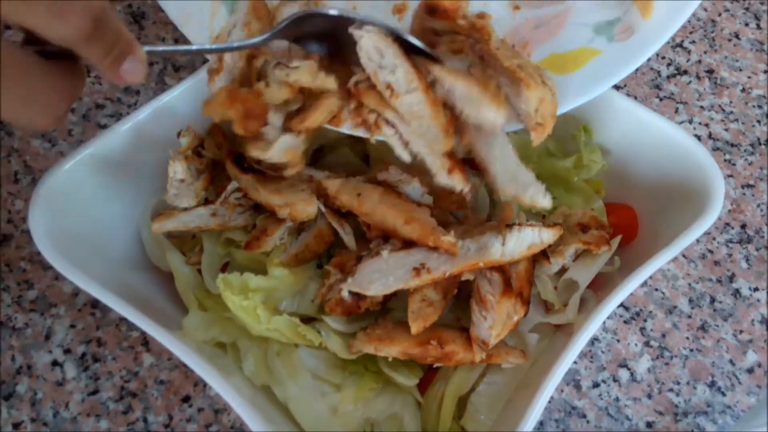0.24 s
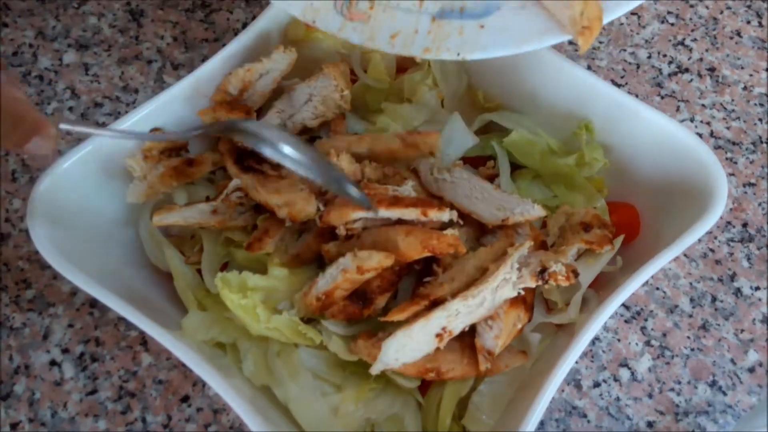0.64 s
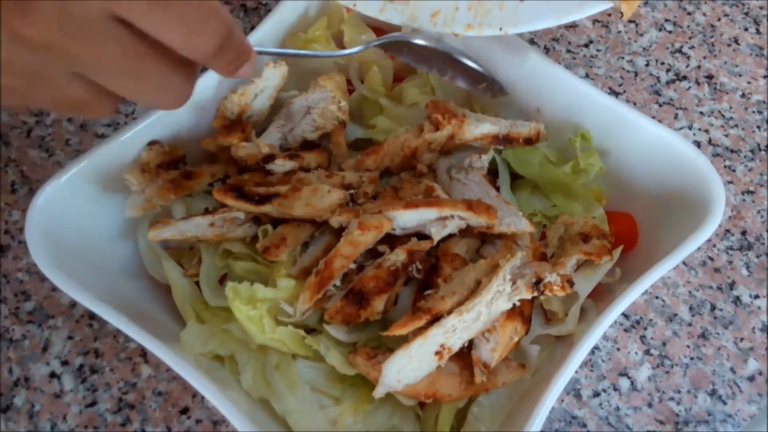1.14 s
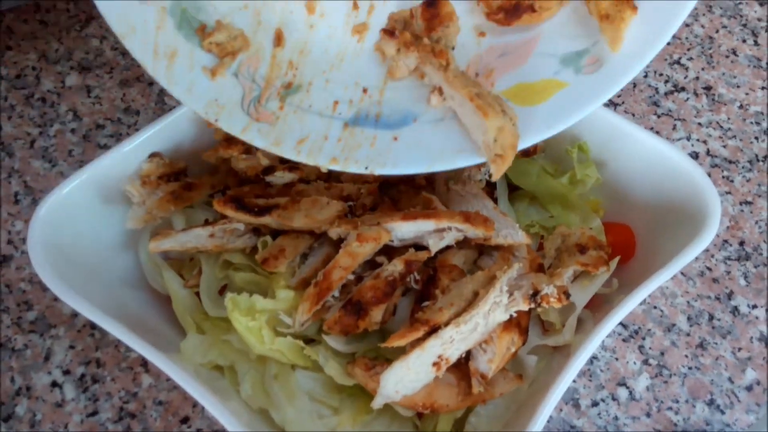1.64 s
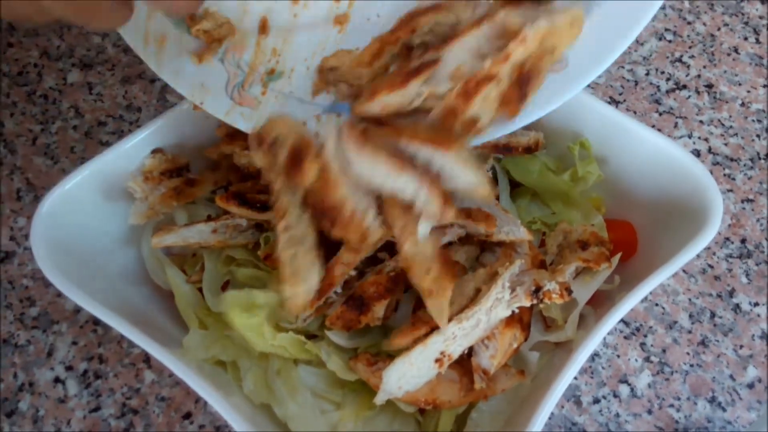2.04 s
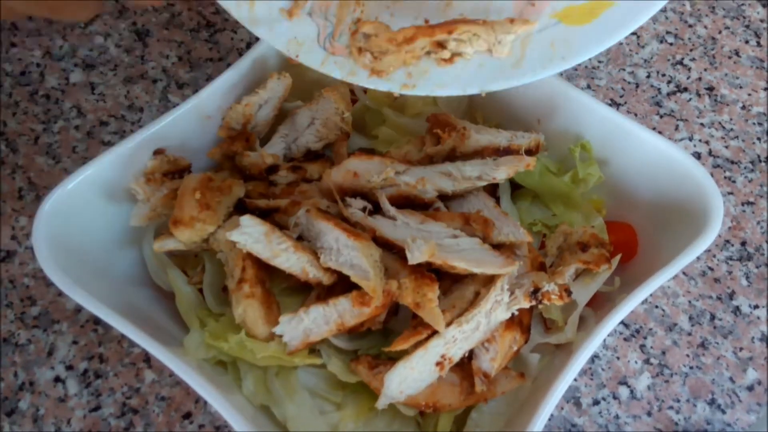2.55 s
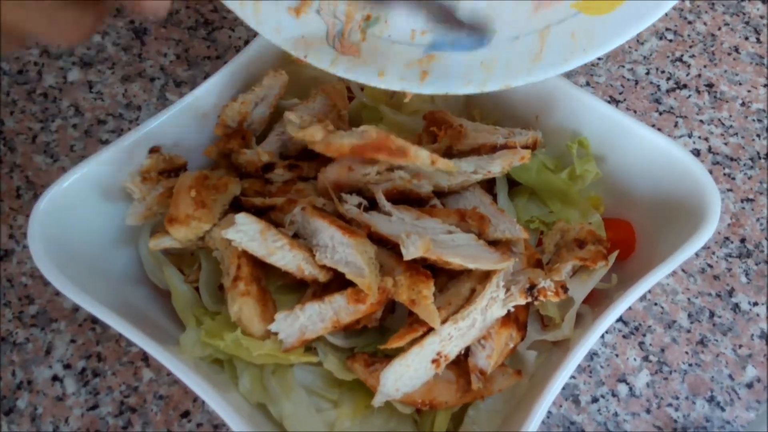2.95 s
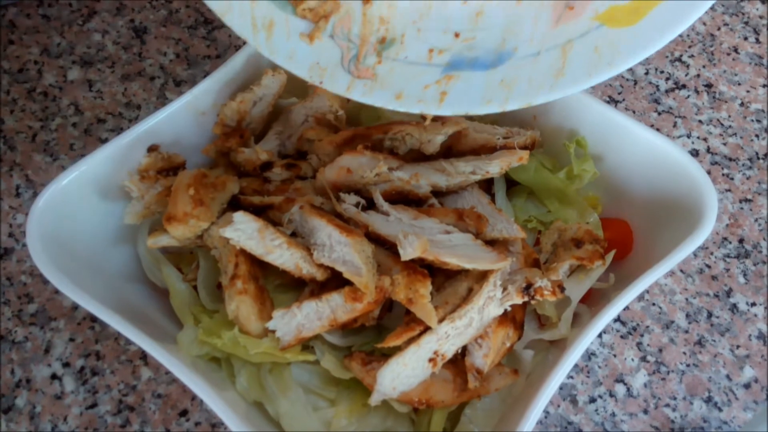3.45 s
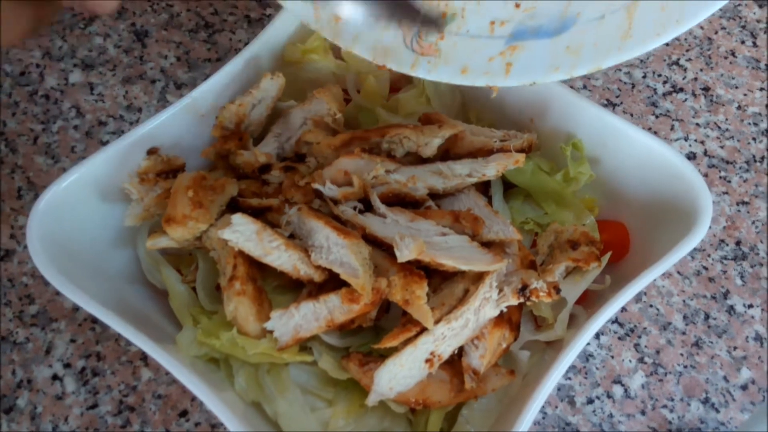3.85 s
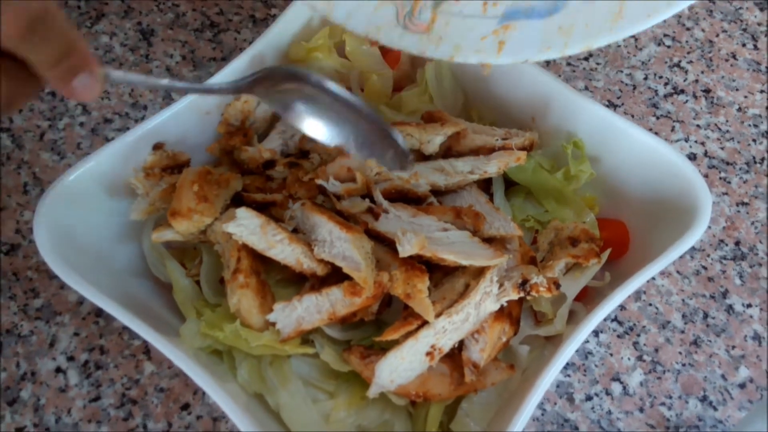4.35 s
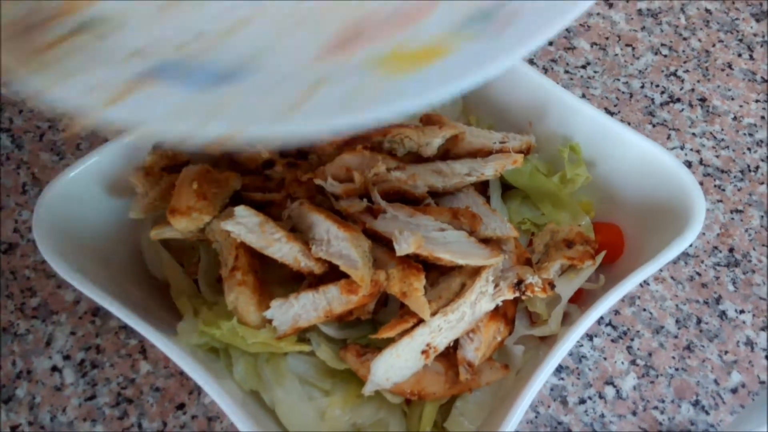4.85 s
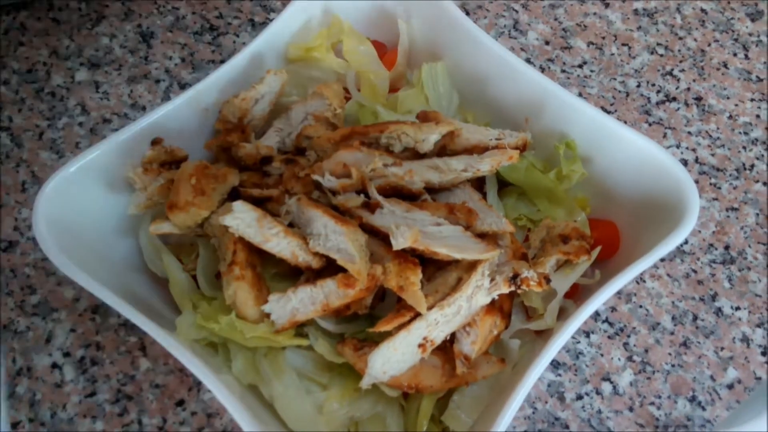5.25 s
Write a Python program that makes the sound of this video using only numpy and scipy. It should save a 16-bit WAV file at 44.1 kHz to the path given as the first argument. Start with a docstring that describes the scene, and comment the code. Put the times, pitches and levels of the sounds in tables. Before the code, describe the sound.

A metal spoon scrapes and clinks against a china plate while pushing chicken pieces into a salad bowl in a quiet, hard-walled kitchen.

```python
"""Spoon, plate and salad bowl

A steel spoon pushes pieces of chicken off a china plate into a salad bowl in a hard-walled kitchen.
Clinks are a noisy clack plus ringing plate modes; knocks through food excite only low bowl modes.
Scrapes and grazes are trains of jolts that rasp and ring plate, spoon and rim; sharp ticks dot the scene.
A noise tail rings after every touch; coloured noise, faint appliance lines and low swells lie behind.
"""
import sys
import numpy as np
from scipy import signal
from scipy.fft import rfft, irfft
from scipy.io import wavfile

SR = 44100
rng = np.random.default_rng(int(sys.argv[2]) if len(sys.argv) > 2 else 0)


def waveform_to_disk(signal):
    """Save audio, clipped to [-1, 1], as 16-bit WAV at the path in sys.argv[1]."""
    frames = np.transpose(np.atleast_2d(signal))
    scaled = np.clip(frames, -1, 1) * 32767
    samples = np.round(scaled).astype(np.int16)
    wavfile.write(sys.argv[1], SR, samples)


N = 241844
SIZE = 2 ** 15  # samples allowed for one contact and its ring
T = np.arange(SIZE) / SR
FREQS = np.arange(SIZE + 1) * SR / (2 * SIZE)

# Hard contacts on the plate, spoon blows and light touches of plate and bowl:
# start_s, ring_db, clack_db (both before the layer trims),
# face_db (face modes against edge modes), node_hz (pitch of the quiet modes), tilt_db_per_octave
CLINKS = [(.13, -21, -43, -5, 1120, -1), (2.8637, 3, 6.5, 1.5, 2160, -1.96),
          (3.4080, 8, 2.5, -6, 4450, -1.6), (3.7505, -19.5, -21, 0.5, 3260, 0),
          (3.787, -12.5, -11, -3.5, 5070, -1.2), (4.2678, -0.5, -3.5, -5.5, 4190, -2.5),
          (4.451, -16.5, -4, -4, 3870, -2.7)]
# Plate modes, one list per column: pitch_hz; relative level_db; ring time t60_s
PLATE_HZ = [1139, 1163, 2052, 2079, 3262, 3354, 3797, 3870, 4150, 4285, 4335, 4655, 4898, 5120, 5190, 5335,
            5878, 6155, 6287, 6858, 7160, 7222, 7695, 8130, 8920, 9445, 9760, 9930, 11070, 11950]
PLATE_DB = [-7.5, -7, 0.5, -8.5, -10.5, -2, -5, -6.5, -11, -5.5, 0, -8.5, -1.5, -2, -4, -1.5, -26.5, -7.5,
            -13.5, -17.5, -9, -17, -10.5, -23.5, -29.5, -21, -13, -29.5, -28, -29]
PLATE_T60 = [0.22, 0.061, 0.1, 0.11, 0.089, .15, .13, 0.13, 0.045, 0.11, 0.091, 0.059, 0.046, .08, .05,
             0.041, 0.078, 0.1, .17, .11, 0.089, 0.15, 0.11, .1, .07, 0.059, .1, 0.13, 0.093, 0.046]
PLATE = list(zip(PLATE_HZ, PLATE_DB, PLATE_T60))
# Bending series of the plate's edge: pitch_hz; the other plate modes belong to its face
EDGE_HZ = [1150, 2060, 3310, 5150, 7200, 9450, 11950]
# Colour of the clack: pitch_hz, relative level_db
CLACK_COLOUR = [(40, -30), (200, -32.5), (330, -17.5), (480, -10.5), (620, 2.5), (850, -1.5), (1200, -5.5),
                (1800, -3.5), (2700, -4), (4500, 5), (7200, 6), (8500, -8.5), (12000, -12.5), (15500, -30)]

# Spoon pressing through food onto the bowl: start_s, level_db (before the layer trims)
KNOCKS = [(0.7837, -16.5), (1.063, -33), (1.0715, -14.5), (1.085, -21), (2.553, -23)]
# Modes of the filled bowl, damped by food: pitch_hz, relative level_db, t60_s
BOWL = [(222, -14, .15), (312, -11, .08), (425, -10, .07), (635, 0, .06), (714, -6, .04), (791, -6, .06),
        (1000, -9, .05), (1141, -8, .07), (1270, -9, .05), (1441, -8, .2), (1531, -14, .15)]
# Colour of the cushioned thud: pitch_hz, relative level_db
THUD_COLOUR = [(25, -51.5), (60, -24), (160, -9.5), (400, -4), (640, 11), (1000, -8), (1500, -4.5),
               (1750, -22.5), (2600, -25), (3300, -45.5), (8000, -67.5)]

# Scrapes of the spoon on the plate, and short grazes that ring the bowl's rim:
# peak_s (hardest push), rise_s, fall_s,
# rasp_db, plate_db, spoon_db, rim_db (levels of the four layers, each scaled by the push)
SCRAPES = [(.02, 0.3, 0.036, -38.5, -58, -32.5, -70), (.061, 0.011, 0.098, -40.5, -72, -40, -73),
           (3.512, .02, 0.027, -52, -34.5, -44.5, -57), (3.555, .04, 0.081, -39.5, -40, -35, -67),
           (3.68, 0.024, 0.034, -52.5, -43, -43, -49), (3.789, .021, 0.0076, -35, -40.5, -64.5, -31.5),
           (4.429, .03, 0.013, -39, -43, -46, -32), (4.453, 0.013, 0.013, -39, -32.5, -55, -32.5)]
# Modes of the squealing spoon: pitch_hz, relative level_db, t60_s
SPOON = [(3330, -14, .12), (3885, -11, .1), (4032, -6, .12), (4190, -4, .07), (4855, -7, .1),
         (4958, 0, .14), (5173, -9, .08), (6045, -6, .1), (6135, -6, .1), (6247, -3, .12), (6385, -4, .09),
         (8250, -16, .15), (10900, -23, .05), (11700, -21, .05)]
# Modes of the bowl's bare rim: pitch_hz, relative level_db, t60_s
RIM = [(1052, -9, .1), (1310, -12, .1), (1500, -10, .15), (3010, -9, .1), (3826, -5, .15), (3871, -4, .2),
       (4574, -7, .15), (5316, -4, .12), (5480, -4, .08), (6020, -6, .12), (6260, -1, .1), (6415, 0, .12),
       (6520, -2, .12), (6850, -6, .12), (7520, -7, .08), (8280, -14, .08), (8980, -13, .12),
       (9930, -17, .15)]
# Colour of the rasp: pitch_hz, relative level_db
RASP_COLOUR = [(40, -24), (200, -13.5), (330, -17.5), (450, -14.5), (650, -3.5), (1100, 6.5), (1600, 7.5),
               (2700, 1), (4000, 7), (5400, 5.5), (5750, 2.5), (6450, 8), (8600, -6), (15500, -21)]

# Small sharp ticks: start_s, level_db, pitch_hz, width_hz (of one resonance stage), room_db
TICKS = [(0.28, -54, 4900, 800, 0), (1.5922, -36.5, 9340, 2200, -5), (4.8384, -29.5, 6000, 3100, -10.5),
         (4.838, -38, 1400, 1800, -24.5)]
# Kitchen decay: pitch_hz, t60_s
ROOM_T60 = [(150, 0.57), (600, 0.26), (1500, 0.39), (3500, 0.34), (6500, 0.34), (10000, 0.26),
            (16000, 0.32)]
# Colour of the room air: pitch_hz, relative level_db
AIR_COLOUR = [(25, -17), (60, -14), (140, -1), (200, -5), (300, -2.5), (520, -6.5), (700, -7.5),
              (1300, -10), (1900, -13), (2300, -10), (3000, -15), (6300, -17.5), (8700, -29), (15500, -33)]
# Appliance lines: pitch_hz, level_db
WHINE = [(200, -84), (487, -81), (534, -78.5), (1265, -83), (2190, -81.5), (2287, -83.5), (2385, -90),
         (2690, -89.5), (3257, -91)]
# Soft low tones: peak_s, level_db, pitch_hz, half_s (time from the peak down to 1/e)
SWELLS = [(1.015, -67.5, 234, 0.051), (2.332, -58.5, 230.5, 0.052)]

NODE_DEPTH_DB, NODE_OCTAVES = 12, 0.18  # gap in the colour of a blow around its node pitch
CLACK_FOLLOWS = 0.52  # share of the blow's colour that the clack takes on
TILT_PIVOT_HZ, TILT_FROM_HZ = 3460, 600  # tilt is zero at the pivot and flat below the second pitch
PUSH_SWING_DB = 24  # a push grows by this much over its rise and sinks by as much over its fall
PUSH_ROUNDNESS = 1.38  # 1 gives a pointed peak of force, 2 a rounded one
AIR_DB = -71
CUTOFF_HZ = 15800


def clinks(ring_trim_db=-1.5, clack_trim_db=0.0):
    """Hard contacts on china: a broad clack and the plate's modes, both coloured by the place of the blow."""
    out = np.zeros(N)
    for start_s, ring_db, clack_db, face_db, node_hz, tilt_db in CLINKS:
        clack_room = kitchen(wet_db=6.5)
        modes = []
        for hz, level_db, t60_s in PLATE:
            struck_db = level_db + face_db * on_face(hz) + blow_colour(hz, node_hz, tilt_db)
            modes.append((hz, struck_db, t60_s))
        colour = [(hz, level_db + CLACK_FOLLOWS * blow_colour(hz, node_hz, tilt_db))
                  for hz, level_db in CLACK_COLOUR]

        single_blow = 1.0 * (T == 0)
        ring = body(single_blow, modes, kitchen(wet_db=3.0))
        add(out, start_s, from_db(ring_db + ring_trim_db) * ring)

        chatter = impact(chatter_db=0.5, chatter_s=0.0042)
        clack = through(through(chatter, pulse(colour)), clack_room)
        add(out, start_s, from_db(clack_db + clack_trim_db) * clack)
    return out


def on_face(hz):
    """Whether a plate mode lies more than 2.5 percent away from every edge mode."""
    return np.min(np.abs(hz / np.array(EDGE_HZ) - 1)) > .025


def blow_colour(hz, node_hz, tilt_db):
    """Level in dB that a blow gives a pitch: a treble tilt, with a gap for modes that have a node there."""
    tilt = tilt_db * np.log2(max(hz, TILT_FROM_HZ) / TILT_PIVOT_HZ)
    octaves_from_node = np.log2(hz / node_hz)
    return tilt - NODE_DEPTH_DB * np.exp(-(octaves_from_node / NODE_OCTAVES) ** 2)


def knocks(thud_trim_db=5.0, ring_trim_db=-5.0):
    """Food cushions the blow, so a dull thud sounds and only the bowl's low modes answer."""
    out = np.zeros(N)
    for start_s, level_db in KNOCKS:
        room = kitchen(wet_db=2.5)
        force = impact(chatter_db=15.0, chatter_s=0.0058)
        thud = through(through(force, pulse(THUD_COLOUR)), room)
        ring = body(force, BOWL, room)
        knock = from_db(thud_trim_db) * thud + from_db(ring_trim_db) * ring
        add(out, start_s, from_db(level_db) * knock)
    return out


def scrapes(slips_per_s=1500, uneven_db=1.5):
    """Surfaces stick and slip under each push or graze; every slip rasps and rings plate, spoon and rim."""
    out = np.zeros(N)
    for peak_s, rise_s, fall_s, rasp_db, plate_db, spoon_db, rim_db in SCRAPES:
        start_s = max(0, peak_s - 2 * rise_s)
        # slips fall at random, at slips_per_s on average, with random sign and slightly uneven size
        sizes = from_db(uneven_db * np.clip(rng.standard_normal(SIZE), -2, 2))
        sizes = sizes * rng.choice([-1, 1], SIZE)
        slip_happens = rng.random(SIZE) < slips_per_s / SR
        slips = np.sqrt(SIZE) * unit(sizes * slip_happens)
        force = slips * push(start_s + T - peak_s, rise_s, fall_s)

        room = kitchen(wet_db=3.5)
        rasp = through(through(force, pulse(RASP_COLOUR)), room)
        add(out, start_s, from_db(rasp_db) * rasp)
        for level_db, modes in [(plate_db, PLATE), (spoon_db, SPOON), (rim_db, RIM)]:
            ring = np.linalg.norm(force) * unit(body(force, modes, room))
            add(out, start_s, from_db(level_db) * ring)
    return out


def push(t, rise_s, fall_s):
    """Force of the sliding contact: it builds up to time zero, then eases off."""
    distance = np.maximum(-t / rise_s, t / fall_s)
    return from_db(-PUSH_SWING_DB * distance ** PUSH_ROUNDNESS)


def ticks():
    """Tiny clicks, each the impulse of three equal damped resonances in a row, heard in the room."""
    out = np.zeros(N)
    for start_s, level_db, pitch_hz, width_hz, room_db in TICKS:
        click = unit(irfft(resonance(pitch_hz, width_hz) ** 3)[:SIZE])
        add(out, start_s, from_db(level_db) * through(click, kitchen(room_db)))
    return out


def impact(chatter_db, chatter_s):
    """A first touch together with a quickly dying noisy chatter."""
    chatter = unit(rng.standard_normal(SIZE) * np.exp(-T / chatter_s))
    return unit((T == 0) + from_db(chatter_db) * chatter)


def body(force, modes, room, radiation_width=1.0):
    """A force sets each mode ringing into the room; a mode radiates best near its own pitch."""
    drive = rfft(force, 2 * SIZE) * rfft(room, 2 * SIZE)
    total = 0
    for k, (hz, level_db, t60_s) in enumerate(modes):
        ringing = resonance(hz, np.log(1000) / (np.pi * t60_s))
        radiation = resonance(hz, radiation_width * hz)
        mode = drive * ringing * radiation
        sign = (-1) ** k  # neighbouring modes take opposite polarity
        total = total + mode * (sign * from_db(level_db) / np.linalg.norm(mode))
    return irfft(total)[:SIZE] * np.sqrt(SIZE) * np.linalg.norm(force)


def resonance(hz, width_hz):
    """Frequency response of one damped mode."""
    return 1j * FREQS * width_hz / (hz ** 2 - FREQS ** 2 + 1j * FREQS * width_hz)


def pulse(colour):
    """A minimum-phase click: the most compact causal sound with this spectrum."""
    cepstrum = irfft(np.log(from_db(at_hz(colour, FREQS))))[:SIZE]
    causal = 2 * cepstrum * (T > 0)
    return unit(irfft(np.exp(rfft(causal, 2 * SIZE)))[:SIZE])


def kitchen(wet_db, gap_s=0.0027):
    """Direct sound plus a dense tail that builds up quickly and dies at its own rate in each band."""
    white = rfft(rng.standard_normal(2 * SIZE))
    centres = [hz for hz, t60_s in ROOM_T60]
    tail = 0
    for weights, (hz, t60_s) in zip(np.eye(len(centres)), ROOM_T60):
        band = irfft(white * at_hz(list(zip(centres, weights)), FREQS))[:SIZE]
        tail = tail + band * from_db(-60 * T / t60_s)
    build_up = 1 - np.exp(-T / gap_s)
    return unit((T == 0) + from_db(wet_db) * unit(tail * build_up))


def through(x, response):
    """Pass a contact through a response, keeping its energy."""
    filtered = irfft(rfft(x, 2 * SIZE) * rfft(response, 2 * SIZE))[:SIZE]
    return unit(filtered) * np.sqrt(np.sum(x ** 2))


def from_db(db):
    """Decibels to gain."""
    return 10 ** (np.asarray(db) / 20)


def unit(x):
    """Scale to an energy of one."""
    return x / np.sqrt(np.sum(x ** 2) + 1e-20)


def at_hz(points, hz):
    """Read a table on a log-frequency axis."""
    pitch_hz, value = np.transpose(points)
    return np.interp(np.log(hz + 1e-9), np.log(pitch_hz), value)


def add(out, start_s, sound):
    """Mix a sound in from its start time."""
    start = max(0, round(start_s * SR))
    out[start:start + len(sound)] += sound[:N - start]


def background(line_width_hz=10.0):
    """Room air as coloured noise, an appliance's wavering lines as narrow noise, and low sine swells."""
    t = np.arange(N) / SR
    out = from_db(AIR_DB) * noise(lambda f: at_hz(AIR_COLOUR, f))
    for hz, level_db in WHINE:
        line = noise(lambda f: -20 * np.log10(1 + ((f - hz) / line_width_hz) ** 2))
        out = out + from_db(level_db) * line
    for peak_s, level_db, hz, half_s in SWELLS:
        swell = np.exp(-((t - peak_s) / half_s) ** 2)
        tone = np.sqrt(2) * np.sin(2 * np.pi * hz * t)
        out = out + from_db(level_db) * swell * tone
    return out


def noise(shape_db):
    """Steady noise of rms one, coloured by a function of frequency."""
    gain = from_db(shape_db(np.fft.rfftfreq(N, 1 / SR)))
    return np.sqrt(N) * unit(irfft(rfft(rng.standard_normal(N)) * gain, N))


def scene():
    """All layers summed into one channel."""
    return (clinks() + knocks() + scrapes() + ticks() + background())[None]


def record(dry):
    """Cut the top steeply with an elliptic low-pass."""
    low_pass = signal.ellip(10, .2, 80, CUTOFF_HZ, fs=SR, output="sos")  # order, ripple dB, stop dB
    return signal.sosfilt(low_pass, dry)


dry = scene()
out = record(dry)
waveform_to_disk(out)
```